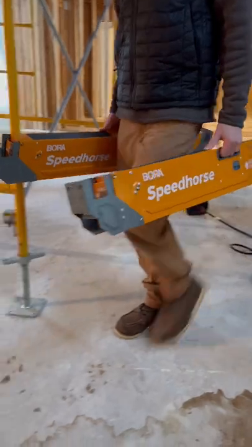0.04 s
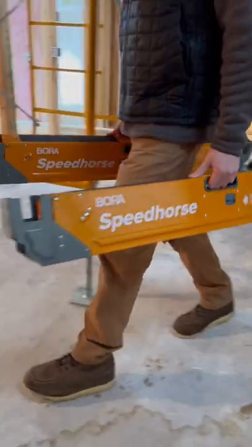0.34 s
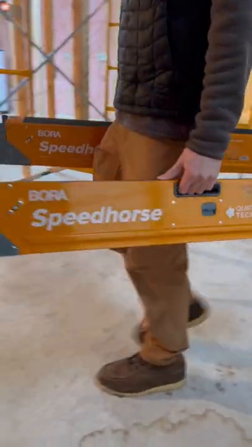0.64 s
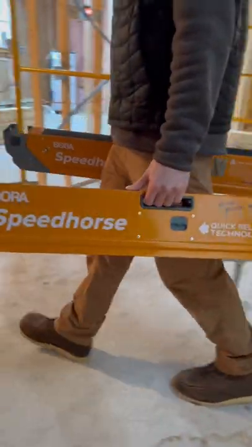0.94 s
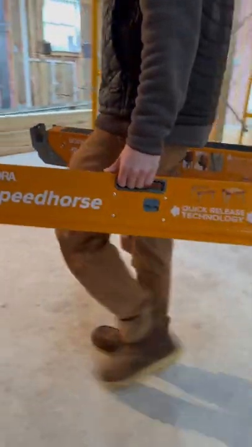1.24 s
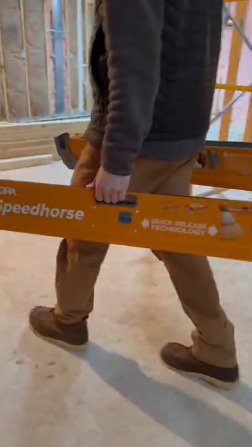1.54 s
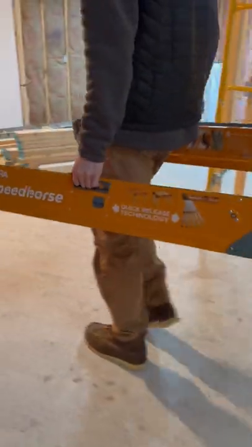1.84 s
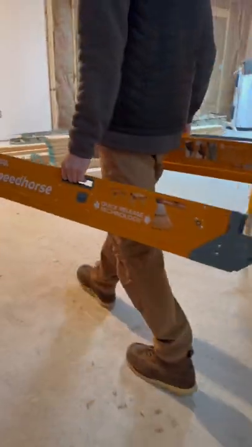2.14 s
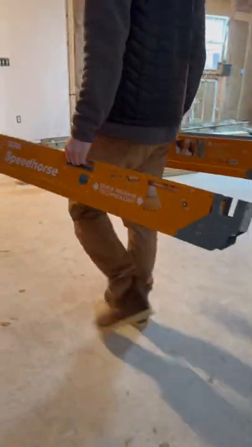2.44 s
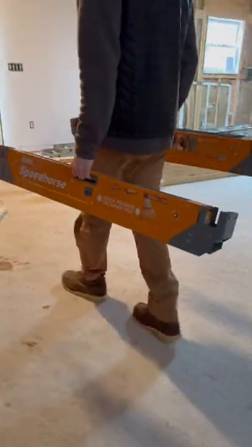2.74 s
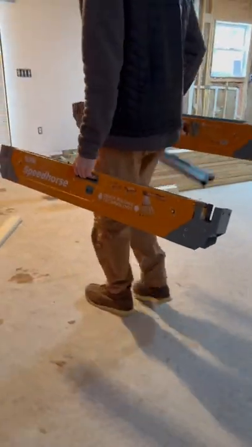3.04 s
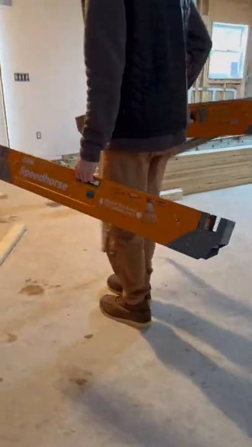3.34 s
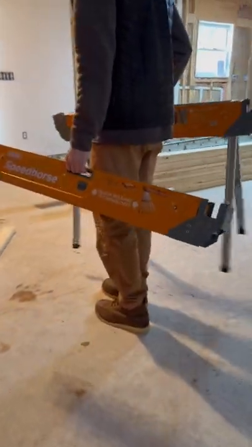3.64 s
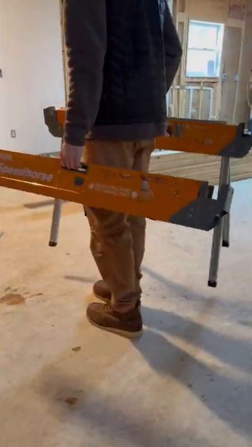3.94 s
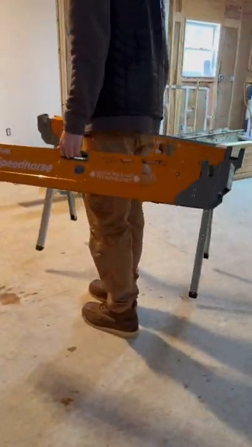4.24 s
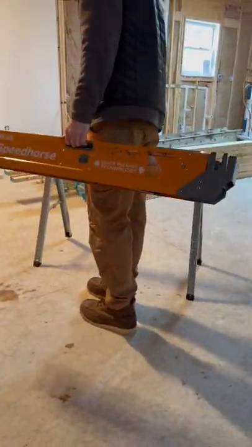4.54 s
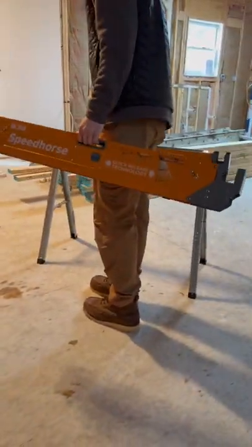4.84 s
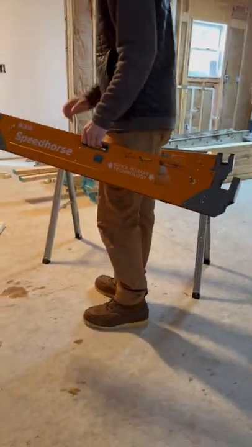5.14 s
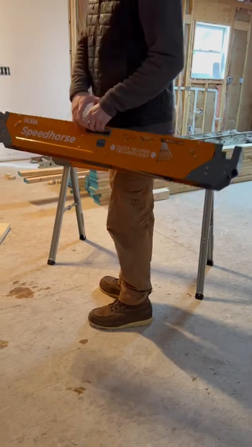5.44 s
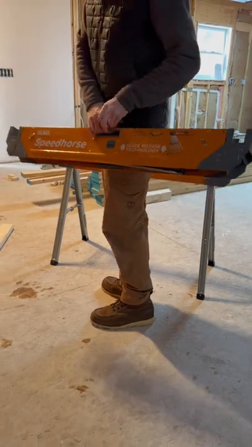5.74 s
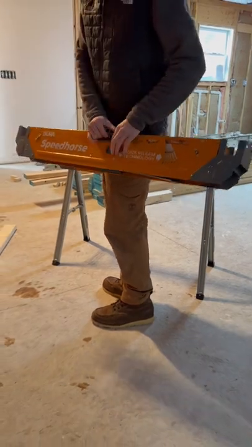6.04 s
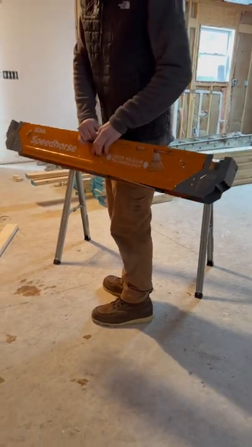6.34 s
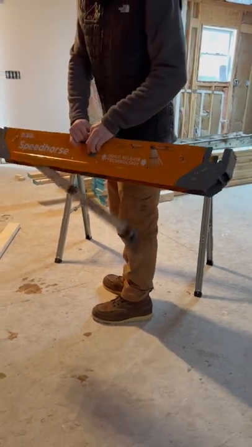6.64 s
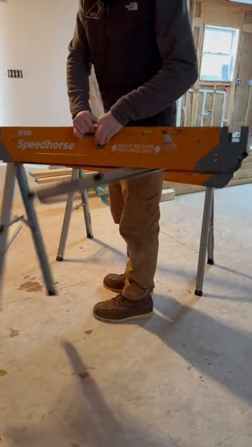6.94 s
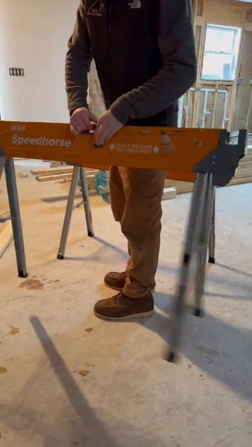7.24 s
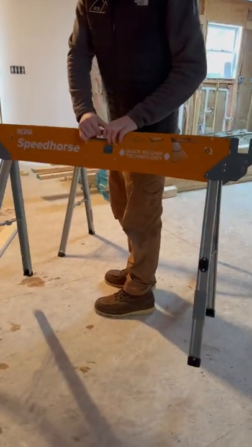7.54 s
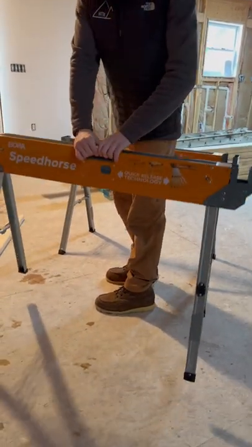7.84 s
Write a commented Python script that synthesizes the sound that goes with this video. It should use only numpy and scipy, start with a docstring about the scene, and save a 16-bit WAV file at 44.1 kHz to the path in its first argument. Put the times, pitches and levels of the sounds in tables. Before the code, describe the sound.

In a bare room with a short echo, soft gritty footsteps slow to a shuffle. Metal legs clack and scrape as a folding sawhorse opens, then it lands with a deep thud and rocks briefly. Loose parts rattle lightly before a latch snaps and the legs of a second sawhorse swing out with bright, ringing clacks. Faint clothing rustle and a low room rumble lie underneath, with the action a little to the right.

```python
"""In a bare room with a concrete floor, a man in work boots carries two folded steel sawhorses.
He unlatches the first, its legs scrape open and lock, and he drops it on its rubber feet with a boom;
then the legs of the second clack open. Steel hitting steel clangs and sets the top beam ringing.
His boots thump and brush over dust, his clothes rustle, and the hard walls echo every blow."""
import sys
import numpy as np
from scipy import signal
from scipy.fft import rfft, irfft, next_fast_len
from scipy.io import wavfile
from scipy.ndimage import map_coordinates

SR = 44100
rng = np.random.default_rng(int(sys.argv[2]) if len(sys.argv) > 2 else 0)


def transcribe(u):
    """Save the signal u as a 16-bit wav file named by the first command-line argument.

    u: samples, shape (n,) or (channels, n), limited to [-1, 1]; the rate is SR.
    q: integer samples, one column per channel.
    """
    v = np.clip(np.atleast_2d(u).T, -1, 1)
    q = np.round(v * 32767).astype(np.int16)
    wavfile.write(sys.argv[1], SR, q)


N = 347949
T = np.arange(SR) / SR  # the second that follows a blow
HZ = np.fft.rfftfreq(SR, 1 / SR)
WALK_END_S, SECOND_HORSE_S = 2.4, 5.4  # his strides turn to shuffles; he turns to the second sawhorse

# Heel strikes. Each row: start in seconds, level in dB, pitch in Hz, relative level of the grit in dB.
HEEL_STRIKES = [(.268, -34.5, 137, -6), (.898, -25, 179, -14.5), (1.423, -36.5, 172, 1),
                (2.084, -28, 207, -30), (2.621, -32.5, 184, -12.5), (2.744, -23.5, 380, -26.5),
                (3.285, -32, 150, -24), (5.135, -31.5, 299, -17)]
# The tone of clanging steel, crunching grit and a slapping sole. Each row: frequency in Hz, level in dB.
STEEL_TONE = [(60, -39), (150, -6), (270, -7), (400, 3), (750, 3), (1300, -5.5), (1800, -6), (2800, -4.5),
              (4800, -17), (7000, -16.5), (10000, -23), (16000, -26)]
GRIT_TONE = [(100, -25.5), (500, -20.5), (1000, 1.5), (2200, 3.5), (5000, -23), (15000, -71)]
SOLE_TONE = [(60, -20), (170, -7.5), (350, 3.5), (520, -8.5), (800, -7), (1500, -27.5), (4000, -64)]


def amp(db):
    """Turn decibels into a number to multiply by."""
    return 10 ** (np.asarray(db) / 20)


def unit(x):
    """Scale a signal so that its average power is 1."""
    return x / np.sqrt(np.mean(x ** 2) + 1e-20)


def along(points, hz):
    """Read between the rows of a table of frequencies and values."""
    freqs, values = np.transpose(points)
    return np.interp(np.log(hz + 1), np.log(freqs + 1), values)


def wobble(rate):
    """A smooth curve through rate random values a second."""
    return map_coordinates(rng.standard_normal(int(N * rate / SR) + 4), [np.arange(N) * rate / SR])


def filtered(x, response):
    """Turn each frequency up or down by the gain that response gives it."""
    size = next_fast_len(x.shape[-1] + 4096, True)
    return irfft(rfft(x, size) * response(np.fft.rfftfreq(size, 1 / SR)), size)[..., :x.shape[-1]]


def noise(tone, size):
    """Stereo noise with the given tone; both ears hear nearly the same bass."""
    # Sound from all around. Each row: frequency in Hz, how alike left and right are (1 is the same).
    likeness = [(100, 0.98), (300, 0.95), (700, 0.53), (1400, 0.9), (3000, 0.46), (7000, 0.22),
                (15000, 0.11)]
    hz = np.fft.rfftfreq(size, 1 / SR)
    width = np.arccos(along(likeness, hz)) / 2
    spectrum = rfft(rng.standard_normal((2, size))) * amp(along(tone, hz))
    mid, side = irfft(spectrum * [np.cos(width), np.sin(width)], size)
    return unit(np.array([mid + side, mid - side]))


def swell(rise):
    """A loudness curve that reaches 1 after rise seconds, then dies away."""
    u = T / rise
    return u * np.exp(1 - u)


def hump(s, db, rise, fall):
    """A loudness curve that climbs 20 dB in rise seconds, peaks at s and drops 20 dB in fall seconds."""
    t = np.arange(N) / SR - s
    return amp(db - 20 * np.maximum(-t / rise, t / fall))


def add(track, s, sound):
    """Mix a sound into the track at s seconds."""
    part = track[:, round(s * SR):][:, :SR]
    part += sound[..., :part.shape[1]]


def in_room(sound, echo_db, build_s=0.0017):
    """A sound plus its echo, which builds up as the walls answer."""
    # How long the room rings. Each row: frequency in Hz, seconds to fade by 60 dB.
    echo_times = [(60, 0.31), (200, 0.78), (400, 0.45), (700, 0.47), (2500, 0.46), (6000, 0.4),
                  (11000, 0.31), (16000, 0.22)]
    hz, t, hiss = signal.stft(noise([(20, 0), (20000, 0)], size=SR), SR, nperseg=256)
    fading = hiss * amp(-60 * t / along(echo_times, hz)[:, None])
    tail = signal.istft(fading, SR, nperseg=256)[1][:, :SR] * (1 - np.exp(-(T / build_s) ** 2))
    echo = signal.fftconvolve(np.atleast_2d(sound), tail, axes=1)[:, :SR]
    return sound + amp(echo_db) * np.std(sound) * unit(echo)


def room_air():
    """The quiet room's low, steady rumble."""
    # The rumble's tone. Each row: frequency in Hz, relative level in dB.
    air_tone = [(20, -7), (40, 5), (65, 7), (100, 2.5), (170, -9.5), (300, -21), (550, -25.5), (1000, -40),
                (2000, -35.5), (5000, -51), (16000, -62)]
    return amp(-51) * noise(air_tone, size=N)


def clothes():
    """Trousers rub after each stride and the vest with each reach, in small uneven grains."""
    # Arms move against the vest. Each row: peak time in seconds, relative level in dB, fade in seconds.
    arm_moves = [(0, -58.5, 0.3), (2.85, -60.5, 0.92), (5.2, -61, 1), (5.73, -56, 0.18), (6.0, -69.5, .45),
                 (7.65, -67, .9)]
    # The tone of rubbing cloth. Each row: frequency in Hz, relative level in dB.
    cloth_tone = [(100, -14), (220, -9), (500, -13), (1000, -18.5), (2500, -19), (5000, -25), (8000, -26.5),
                  (10500, -37.5), (16000, -33.5)]
    strides = [hump(s + 0.27, db=-61.5, rise=0.73, fall=0.73) for s, *_ in HEEL_STRIKES if s < WALK_END_S]
    reaches = [hump(s, db, fade, fade) for s, db, fade in arm_moves]
    rubbing = np.linalg.norm(strides + reaches, axis=0)
    grains = unit(amp(0.5 * wobble(21) + 1.4 * wobble(120)))
    return amp(5.5) * rubbing * grains * noise(cloth_tone, size=N)


def heel(hz, grit_db):
    """A heel meets concrete: a soft thump, the slap of rubber and some grit."""
    pitch = hz * (0.65 + 1.26 * np.exp(-T * hz / 0.9))  # the note sinks as the rubber flattens
    thump = swell(1.2 / hz) ** 2 * np.sin(2 * np.pi * np.cumsum(pitch) / SR)
    slap = amp(-9.5) * noise(SOLE_TONE, size=SR) * swell(0.0032)
    grit = amp(grit_db - 3) * noise(GRIT_TONE, size=SR) * amp(-60 * T / 0.05)
    return in_room(thump + slap + grit, echo_db=-2.5, build_s=0.004)


def boots():
    """Heels strike and soles scuff; in a full stride his weight settles and the toe slaps down."""
    # Soles brush over dust. Each row: start in seconds, level in dB, rise in seconds.
    scuffs = [(.022, -39, .02), (0.263, -45.5, 0.0036), (1.238, -48, 0.013), (1.420, -45, 0.02),
              (1.68, -57, 0.026), (2.35, -61, 0.065), (2.479, -50, 0.017), (2.62, -46, 0.017)]
    # The tone of that brushing. Each row: frequency in Hz, relative level in dB.
    dust_tone = [(200, 1), (900, -1), (2000, -8), (7000, -5), (10000, -9), (15000, -14.5)]
    out = np.zeros((2, N))
    for s, db, hz, grit_db in HEEL_STRIKES:
        add(out, s, amp(db) * heel(hz, grit_db))
        if s < WALK_END_S:
            weight = swell(0.019) * np.sin(2 * np.pi * 79.3 * T)
            add(out, s, amp(-39.5) * in_room(weight, echo_db=-1, build_s=0.022))
            toe = (noise(SOLE_TONE, size=SR) + amp(-16.5) * noise(GRIT_TONE, size=SR)) * swell(0.0025)
            toe_db = -39 - 4.5 * s  # fainter as he walks away
            add(out, s + 0.125, amp(toe_db) * in_room(toe, echo_db=1))
    for s, db, rise in scuffs:
        add(out, s, amp(db) * in_room(noise(dust_tone, size=SR) * swell(rise) ** 2, echo_db=-6.5))
    return out


def beam_ring(s):
    """The beam he holds at s seconds rings with many notes, in a new mix each time; high ones die first."""
    # Each steel beam's own notes. Each row: pitch in Hz, relative level in dB.
    first_beam = [(462, 8), (482, -10.5), (570, -15.5), (702, 6), (812, -1.5), (905, -28), (1142, -2.5),
                  (1355, -3), (1429, -31), (1797, -11.5), (2383, -8), (2631, -16.5), (3004, -13.5),
                  (3255, -14)]
    second_beam = [(399, 0), (465, 1), (690, 11), (794, 5.5), (985, -10.5), (1101, 0.5), (1419, -14.5),
                   (1644, -8), (1780, -17.5), (1903, -20), (1979, -11.5), (2156, 4), (2481, -11),
                   (2613, -21), (2716, 3), (3056, -1.5), (3745, -6)]
    hz, db = np.transpose(first_beam if s < SECOND_HORSE_S else second_beam)[:, :, None]
    t = T[:SR // 4]
    fade_s = 0.24 * (500 / hz) ** 0.25
    strength = amp(db + 4 * rng.standard_normal(hz.shape))
    notes = strength * amp(-60 * t / fade_s) * np.sin(2 * np.pi * (hz * t + rng.random(hz.shape)))
    ring = notes.sum(axis=0) * (1 - np.exp(-t / 0.008))
    return unit(np.pad(ring, (0, SR - len(t))))


def hinges():
    """Swinging legs stick and slip in their pivots, which makes the beam sing."""
    # Leg swings. Each row: fastest moment in seconds, relative level in dB, run-up in seconds.
    swings = [(2.96, -41, 0.25), (3.21, -27, 0.23), (3.39, -34.5, 0.21), (3.68, -32, 0.67),
              (4.54, -25, 0.095), (4.7, -37.5, .2), (6.7, -27, 0.054), (6.91, -31.5, 0.11),
              (7.15, -31.5, 0.39)]
    first = [row for row in swings if row[0] < SECOND_HORSE_S]
    second = [row for row in swings if row[0] >= SECOND_HORSE_S]
    out = np.zeros((2, N))
    for horse in (first, second):
        speed = np.max([hump(s, db, run_up, fall=0.12) for s, db, run_up in horse], axis=0)
        scrape = speed * unit(amp(0.78 * wobble(130))) * noise(STEEL_TONE, size=N)
        sing = signal.fftconvolve(scrape, beam_ring(horse[0][0])[None], axes=1)[:, :N]
        out += amp(-2.5) * scrape + amp(-2) * np.std(scrape) * unit(sing)
    return out


def rubber_feet():
    """Rubber feet turn each blow into a low push of a few cycles that booms in the room."""
    # The first sawhorse lands and rocks. Each row: start in seconds, level in dB, pitch in Hz.
    landings = [(4.350, -5, 144.7), (4.355, -4.5, 77.3), (4.4887, -0.5, 364.6), (4.497, -6, 121.2),
                (4.510, -5, 159.7), (4.535, -10, 66.7), (4.58, -11, 81.2), (4.717, -17, 66.6)]
    out = np.zeros((2, N))
    for s, db, hz in landings:
        push = swell(0.53 / hz) * np.sin(2 * np.pi * hz * T)
        add(out, s, amp(db) * in_room(push, echo_db=-1.5, build_s=0.015))
    return out


def steel_hit(low_db, high_db, fade_s, rise, ripple_db):
    """Steel on steel: a crowd of fast-dying notes; heavy blows have more lows, hard ones more highs."""
    low_band = 1 / (1 + (HZ / 1200) ** 6)
    high_band = 1 - 1 / (1 + (HZ / 4000) ** 6)
    # each spot on the steel favours its own notes
    ripple = (1 - high_band) * map_coordinates(rng.standard_normal(200), [HZ / 140])
    crowd = rfft(noise(STEEL_TONE, size=SR)) * amp(ripple_db * ripple)
    fade = amp(-60 * T / fade_s) * (1 - np.exp(-T / rise))
    chatter = amp(2.5 * map_coordinates(rng.standard_normal(600), [T * 500]))
    bands = (low_band, 1 - low_band - high_band, high_band)
    lows, mids, highs = (unit(irfft(crowd * band) * fade * chatter) for band in bands)
    size = np.sqrt(fade_s / np.log(1e6))  # a longer hit carries more energy
    return (amp(low_db) * lows + mids + amp(high_db) * highs) * size


def clack(s, hard_db, chatter_s):
    """One blow and the beam's answer: the harder and shorter, the brighter, and the less the beam rings."""
    length = chatter_s / 0.07  # 1 for a usual blow
    low_db = -2 - hard_db + 2 * np.log2(length)
    rise = 0.0025 * amp(-1.56 * hard_db)
    strike = steel_hit(low_db, hard_db - 5, chatter_s, rise, ripple_db=4.5 / max(length, 1))
    if s < SECOND_HORSE_S:  # the first sawhorse's top treble grows with hardness
        sheen_db = 2 + 1.6 * hard_db
        strike = filtered(strike, lambda hz: amp(sheen_db * (1 - 1 / (1 + (hz / 9800) ** 8))))
    ring = amp(0.5 * low_db - 30) * beam_ring(s)
    return in_room(strike, echo_db=-2.5) + in_room(ring, echo_db=1)


def sawhorses():
    """Latches snap, legs hit their stops and bounce, loose parts rattle and tubes ring."""
    # Latches and legs strike. Each row: start in seconds, relative level in dB, hardness in dB,
    # seconds for the chatter to fade by 60 dB, number of bounces.
    blows = [(2.893, -30, -2.5, 0.08, 0), (2.931, -25, -3.5, .11, 1), (3.081, -23, 1.5, .09, 0),
             (3.143, -19.5, 1, .08, 1), (3.271, -25, -1.5, 0.094, 0), (3.391, -7.5, 3, .055, 2),
             (3.556, -18.5, -0.5, .058, 0), (3.613, -25.5, -3, .1, 0), (3.672, -21, 0, .12, 0),
             (3.689, -13.5, -1.5, .031, 0), (4.346, -26, -4, .27, 0), (4.487, -21, -1, .07, 0),
             (4.500, -15.5, 1, 0.12, 2), (4.717, -31, -7.5, .16, 0), (5.603, -34.5, -6, 0.122, 0),
             (6.4815, -3.5, 3, 0.024, 0), (6.526, -15.5, -2.5, .088, 0), (6.639, -21.5, -3, .035, 0),
             (6.667, -17.5, 3.5, .07, 0), (6.715, -14.5, 0, .053, 0), (6.733, -8, -0.5, .065, 0),
             (6.868, -23, -6.5, 0.055, 0), (6.916, -23.5, -2.5, .09, 0), (7.027, -16.5, 1, .1, 0),
             (7.046, -7.5, 2.5, .055, 1), (7.16, -16.5, -0.5, .066, 0), (7.173, -7.5, 3.5, .055, 0),
             (7.246, -11, 3, .13, 0), (7.283, -5.5, 4.5, .068, 0)]
    # Loose parts shift, too lightly to ring the beam. Each row: start in seconds, relative level in dB.
    rattles = [(1.906, -44.5), (4.909, -39), (5.076, -42.5), (5.969, -48.5), (6.211, -49), (6.364, -41.5),
               (7.703, -42)]
    # A leg tube, its stop or the beam sounds one note.
    # Each row: start in seconds, level in dB, pitch in Hz, seconds to fade by 60 dB.
    knocks = [(3.410, -12.5, 481.7, 0.28), (3.690, -35.5, 701, 0.65), (5.605, -42, 704, 0.77),
              (5.650, -36.5, 428, 0.13), (5.736, -35, 434, .12), (6.481, -9.5, 1650, .032),
              (6.690, -10, 1642, 0.068), (7.047, -7, 712, .06), (7.174, -6.5, 2140, .05),
              (7.284, -18.5, 364, 0.13)]
    bounce_s, bounce_loss_db = 0.019, 4
    out = np.zeros((2, N))
    for s, db, hard_db, chatter_s, bounces in blows:
        for k in range(bounces + 1):
            add(out, s + k * bounce_s, amp(db - 5.5 - k * bounce_loss_db) * clack(s, hard_db - k, chatter_s))
    for s, db in rattles:
        shift = steel_hit(low_db=4.5, high_db=-14.5, fade_s=0.045, rise=0.004, ripple_db=2.5)
        add(out, s, amp(db - 6.5) * in_room(shift, echo_db=3.5))
    for s, db, hz, fade_s in knocks:
        note = np.sin(2 * np.pi * hz * T) * amp(-60 * T / fade_s) * (1 - np.exp(-T / 0.00068))
        add(out, s, amp(db) * in_room(note, echo_db=-14))
    return out


def scene():
    """The man and his sawhorses sound a little to the right, over the room's low rumble."""
    # The balance between the ears. Each row: frequency in Hz, left level minus right level in dB.
    balance = [(150, -.5), (380, -3), (700, -6.5), (1300, -2.5), (2400, -0.2), (4400, 0.4), (15000, -0.5)]
    sources = sawhorses() + hinges() + rubber_feet() + boots() + clothes()
    placed = filtered(sources, lambda hz: amp(np.outer([0.5, -0.5], along(balance, hz))))
    return placed + room_air()


def record(dry):
    """The microphone drops the deepest bass, rounds off the tallest peaks and cuts the highest treble."""
    bottom_hz, top_hz, ceiling = 45, 16000, 0.86
    trimmed = signal.sosfilt(signal.butter(3, bottom_hz, "highpass", fs=SR, output="sos"), dry)
    rounded = trimmed / (1 + np.abs(trimmed / ceiling) ** 8) ** (1 / 8)
    return filtered(rounded, lambda hz: 1 / (1 + (hz / top_hz) ** 120))


dry = scene()
out = record(dry)
transcribe(out)
```